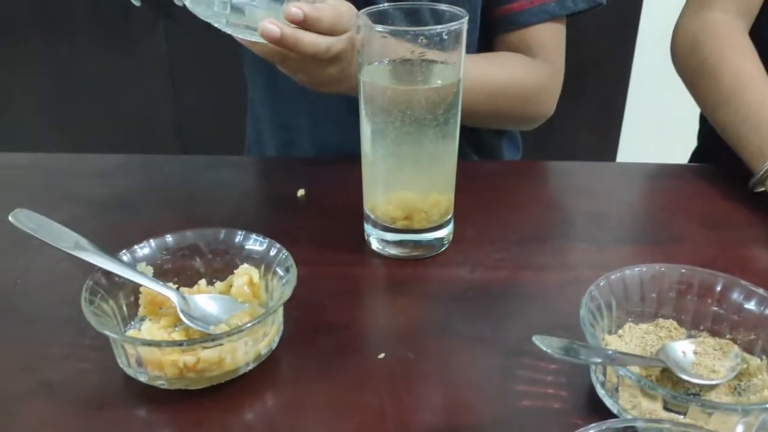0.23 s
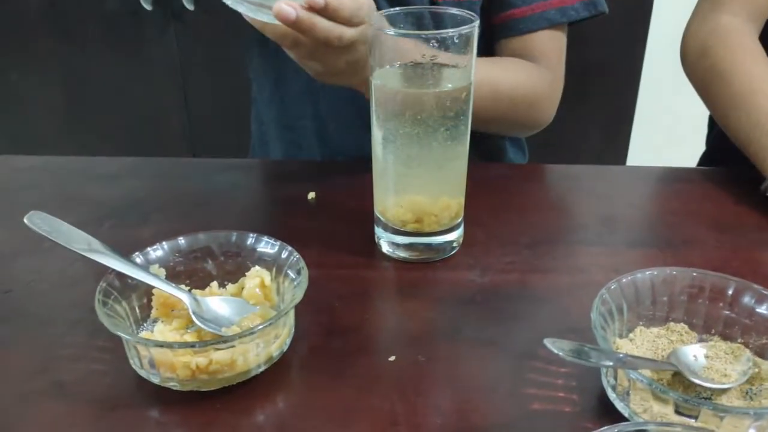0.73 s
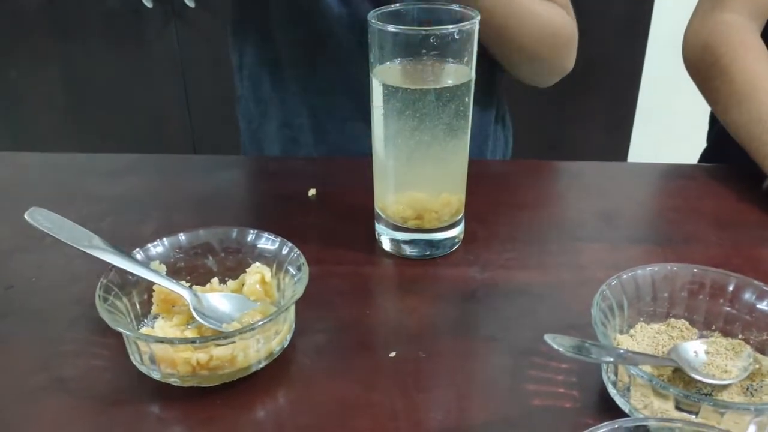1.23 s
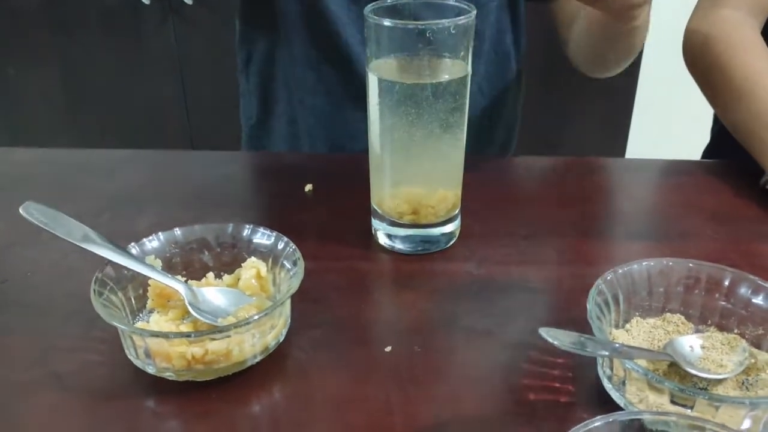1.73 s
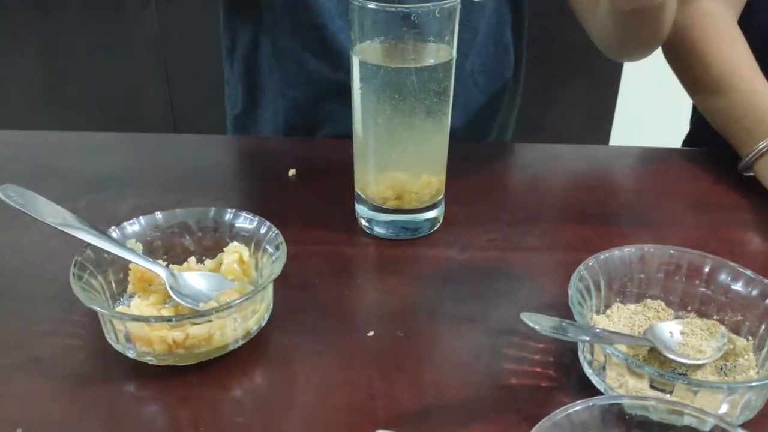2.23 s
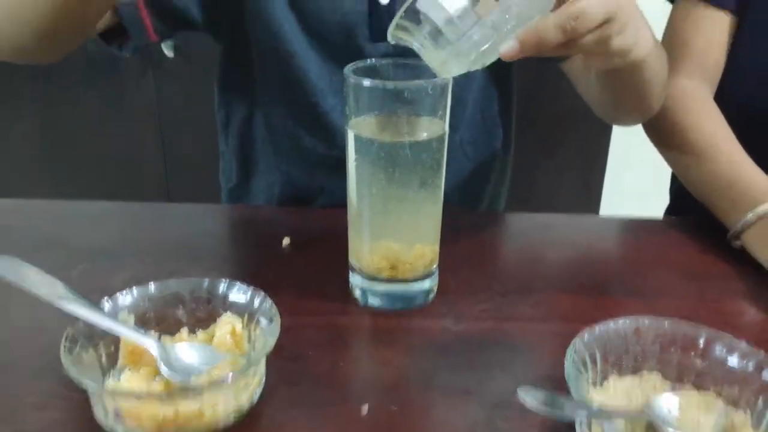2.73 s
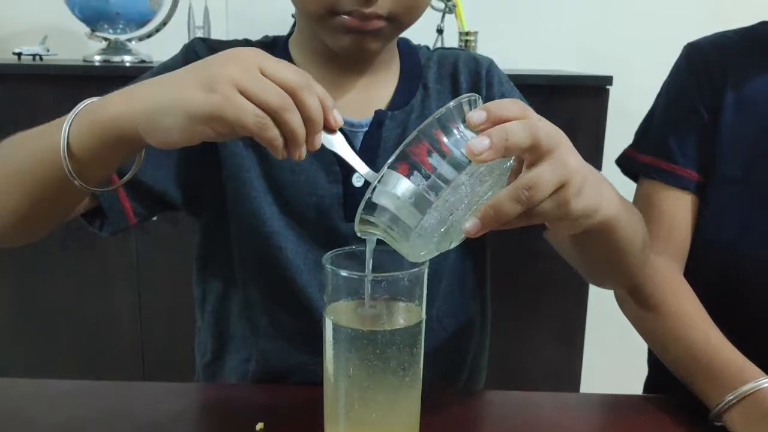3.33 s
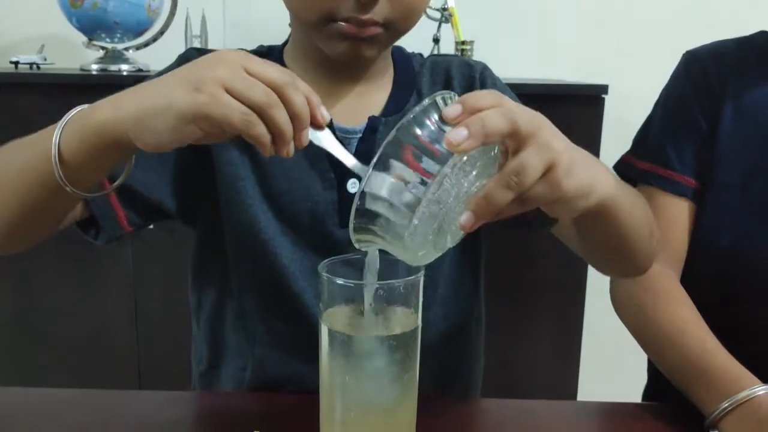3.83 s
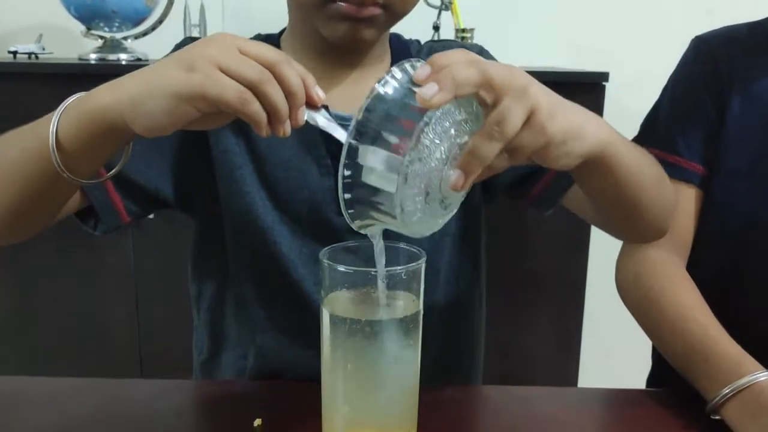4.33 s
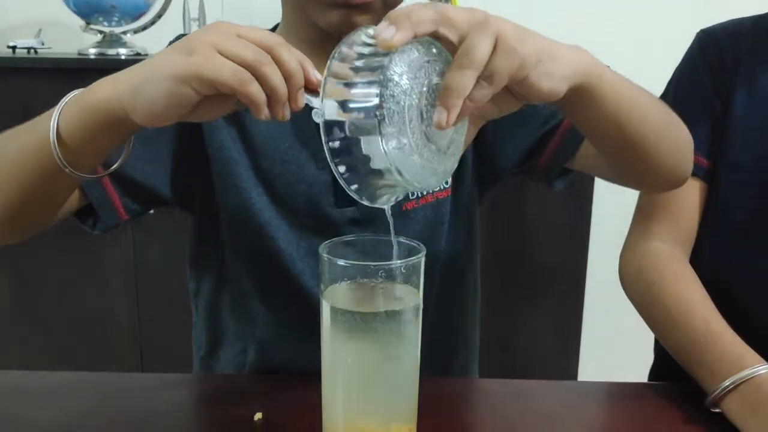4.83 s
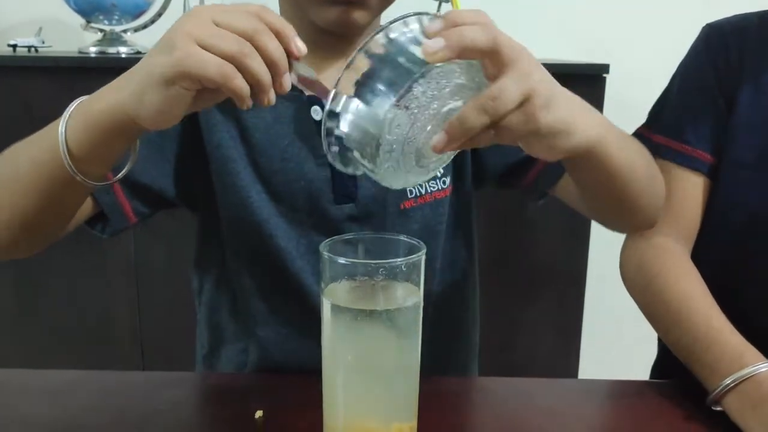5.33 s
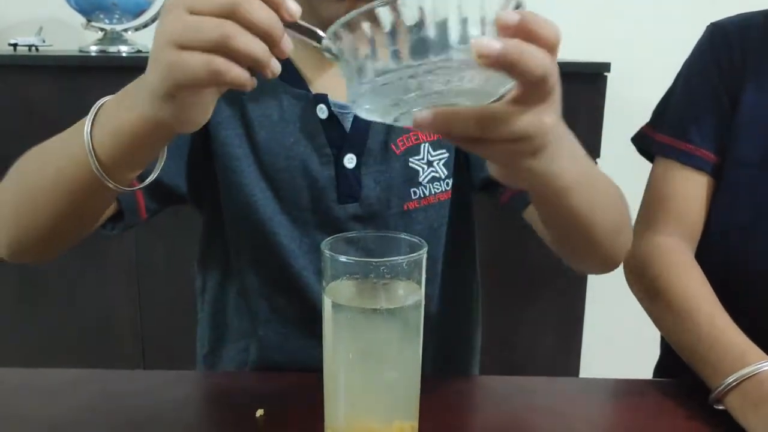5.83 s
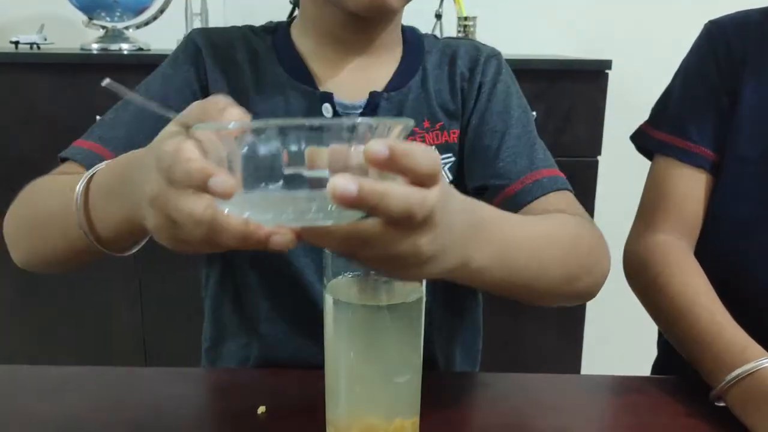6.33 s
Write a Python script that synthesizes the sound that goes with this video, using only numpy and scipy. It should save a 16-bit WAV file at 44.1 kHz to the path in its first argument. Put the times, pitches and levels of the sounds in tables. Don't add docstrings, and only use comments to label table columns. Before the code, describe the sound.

Bright, short clinks of a steel spoon on a small glass bowl, a dish set down, juice trickling faintly, traffic rumbling low behind.

```python
import sys
import numpy as np
from scipy import signal
from scipy.fft import rfft, irfft
from scipy.io import wavfile
from scipy.ndimage import uniform_filter1d

SR = 44100
rng = np.random.default_rng(int(sys.argv[2]) if len(sys.argv) > 2 else 0)


def invert_db(level):
    return 10 ** (np.asarray(level, dtype=float) / 20)


def wrap_up_sound(samples):
    columns = np.atleast_2d(samples).T
    tamed = np.clip(columns, -1, 1)
    steps = np.round(tamed * 32767).astype(np.int16)
    wavfile.write(sys.argv[1], SR, steps)


N = 289852
LEAD = 2048
HZ = np.fft.rfftfreq(N + LEAD, 1 / SR)
CLOCK = (np.arange(N + LEAD) - LEAD) / SR
CONTACT_S = 0.0005
GRAIN_DB = 3


def table(points, hz=HZ):
    f, v = np.transpose(points)
    return np.interp(np.log(hz + 1), np.log(f), v)


def bell(hz, octaves):
    return np.exp(-(np.log2((HZ + 1) / hz) / octaves) ** 2)


def noise(gain):
    x = irfft(rfft(rng.standard_normal(N + LEAD)) * gain, N + LEAD)
    return x / np.std(x)


def even(burst, colour, smooth_hz):
    x = rfft(burst)
    found = uniform_filter1d(np.abs(x) ** 2, size=int(smooth_hz * len(burst) / SR))
    fade = np.exp(-np.arange(len(burst)) / (.03 * SR))
    return irfft(x * colour / np.sqrt(found), len(burst)) * fade


def walk(rate):
    k = int(SR / rate)
    held = np.repeat(rng.standard_normal((N + LEAD) // k + 1), k)
    return uniform_filter1d(uniform_filter1d(held, k), k)[:N + LEAD]


def ring(hz, db, t60):
    t = np.arange(SR // 2)[:, None] / SR
    decay = 1000. ** (-t / np.clip(t60, .004, 3))
    modes = invert_db(db) * decay * np.sin(2 * np.pi * hz * t)
    end_fade = np.hanning(SR)[SR // 2:]
    return modes.sum(axis=1) * (1 - np.exp(-t[:, 0] / CONTACT_S)) * end_fade


def add(track, sound, s, peak_db):
    i = LEAD + int(s * SR)
    n = min(len(sound), len(track) - i)
    track[i:i + n] += sound[:n] * invert_db(peak_db) / np.abs(sound).max()


def crack():
    # f/Hz, level/dB
    crack_colour = [(500, -28.5), (1200, -15.5), (3000, 3.5), (6000, 2), (10000, -3), (14000, 0.5),
                    (16000, -15.5)]
    t = np.arange(SR // 2) / SR
    burst = rng.standard_normal(len(t)) * np.exp(-t / 0.0033) * (1 - np.exp(-t / CONTACT_S))
    x = even(burst, invert_db(table(crack_colour, np.fft.rfftfreq(len(t), 1 / SR))), 150)
    return x / np.abs(x).max()


def air():
    # f/Hz, level/dB per Hz
    air_colour = [(32, -34.5), (55, -2), (87, -7.5), (195, -5.5), (253, -9.5), (362, -10), (531, -18.5),
                  (1880, -22), (5000, -31.5), (6510, -30), (14300, -32), (15400, -29), (16500, -61.5)]
    # f/Hz, likeness/-1..1
    air_alike = [(60, 0.7), (130, 0.96), (290, 0.85), (640, 0.48), (1410, -0.38), (3100, -0.54),
                 (6820, 0.95), (15000, 0.72)]
    # t/s, half width/s, drone level/dB, rumble level/dB
    bass_swells = [
        (.2, 0.97, 1.5, 3),
        (2.1, 0.091, 5, 2.5),
        (3.15, 0.13, 12.5, 1),
        (4.0, 0.12, 7.5, 0.5),
        (4.17, 0.22, 3.5, 11),
        (4.6, 1, 2.5, 2.5),
    ]
    alike = np.clip(table(air_alike), -.9, .99)
    mid_side = rfft(rng.standard_normal((2, N + LEAD)))
    mid, side = mid_side * invert_db(table(air_colour)) * np.sqrt([1 + alike, 1 - alike])
    pair = np.array([mid + side, mid - side])
    bands = ((50, 145), (145, 450), (450, SR))
    rumble, drone, hiss = (irfft(pair * (HZ >= lo) * (HZ < hi), N + LEAD) for lo, hi in bands)
    swell = sum(np.outer(db, np.exp(-((CLOCK - s) / width) ** 2)) for s, width, *db in bass_swells)
    street = invert_db(swell[0] - 0.5) * drone + invert_db(swell[1]) * rumble
    deep = invert_db(-63.5 + walk(13.0)) * noise(bell(35.93, 0.21))
    return (street + hiss) * invert_db(-70.5) / np.std(hiss) + deep


def room():
    # f/Hz, t60/s, level/dB, side share/1
    room_bands = [(155, 0.98, -1, .15), (394.4, 0.76, -4.5, 0.22), (811, 0.86, -7, 0.99),
                  (2080, 0.82, -14.5, 1.3), (4450, 0.69, -14.5, 1.21), (9300, 0.53, -6.5, 0.53),
                  (14470, 0.36, -3.5, 0.57)]
    t = np.arange(SR) / SR
    hz = np.fft.rfftfreq(SR, 1 / SR)
    tail = 0
    for k, (f, t60, db, width) in enumerate(room_bands):
        share = table([(r[0], 1. * (j == k)) for j, r in enumerate(room_bands)], hz)
        mid, side = irfft(rfft(rng.standard_normal((2, SR))) * share, SR)
        pair = mid + width * side * np.array([[1], [-1]])
        tail = tail + invert_db(db) * pair * 1000. ** (-t / t60)
    build_up = np.clip(t / 0.0051, 0, 1) ** 2
    return tail * build_up / np.sqrt(SR / 100)


def ports(share):
    # f/Hz, left minus right level/dB
    port_difference = [(700, -1), (2700, -3.5), (4600, -10), (6400, -15), (8500, -7.5), (10300, 4.5),
                       (11000, 7.5), (12000, 14), (15000, 25)]
    left = invert_db(share * table(port_difference))
    lag = np.exp(-2j * np.pi * HZ * .0001)
    return 2 * np.array([left * lag, np.ones_like(left)]) / (1 + left)


def dish():
    dish_hz = [1487, 2632, 3241, 4430, 4931, 5949, 6340, 7440, 10870, 11190, 1476, 2604]
    # level/dB, t60/s
    dish_modes = [(-15, 1.5), (-7.5, 0.5), (-8.5, 0.53), (-11.5, 0.15), (0.5, 0.061), (-8, 0.2),
                  (5.5, 0.036), (-1, 0.07), (-21, 0.05), (-4.5, 0.043), (-10, 0.41), (-27, 0.44)]
    # f/Hz, level/dB, t60/s
    board_modes = [(65.3, 0.5, 0.14), (190.4, 4.5, 0.061), (286, 6, 0.076), (431, -12.5, 0.067),
                   (630, 10.5, 0.018), (768, 6.5, 0.091), (830, 14, 0.015), (830, 9.5, 0.071),
                   (978, -11, 0.07), (1174, 8.5, 0.052), (1800, 10.5, 0.027)]
    # t/s, peak level/dB, dish level/dB, extra room level/dB
    set_down = [
        (2.978, -11, 6, -1.5),
    ]
    (s, peak_db, dish_db, room_db), = set_down
    db, t60 = np.transpose(dish_modes)
    glass = ring(np.array(dish_hz), db + dish_db, t60)
    board = noise(bell(866, 1.2))[:SR // 2]
    thud = board * np.exp(-np.arange(SR // 2) / (0.0056 * SR))
    hz = np.fft.rfftfreq(len(thud), 1 / SR)
    thud = even(thud, np.exp(-(np.log2((hz + 1) / 800) / 1.14) ** 2), 50)
    thud = 1.81 * thud / np.abs(thud).max()
    landing = ring(*np.transpose(board_modes)) + glass + invert_db(7) * crack() + invert_db(16) * thud
    out = np.zeros(N + LEAD)
    add(out, landing, s, peak_db)
    return out, room_db


def trickle():
    # f/Hz, width/octaves, level/dB
    fizz_bands = [(817, 0.25, -1), (2055, .2, -2), (2720, .15, -0.5)]
    fizz = 0
    for hz, octaves, db in fizz_bands:
        fizz = fizz + invert_db(db + GRAIN_DB * walk(80)) * noise(bell(hz, octaves))
    flow = np.exp(-((CLOCK - 3.795) / 0.51) ** 2)
    return invert_db(-72) * flow * fizz


def gliding_notes(events):
    out = np.zeros(N + LEAD)
    t = np.arange(SR // 10) / SR
    for s, peak_db, hz, t60, glide in events:
        note = np.sin(2 * np.pi * hz * (t + glide * t ** 2)) * 1000. ** (-t / max(t60, .005))
        add(out, note * (1 - np.exp(-t / 0.0022)), s, peak_db)
    return out


def drips():
    # t/s, peak level/dB, f/Hz, t60/s, glide/s^-1
    drops = [
        (3.741, -43, 1660, 0.018, -6.5),
        (3.753, -48.5, 1592, 0.05, -1),
        (4.208, -44, 1695, 0.023, -8.5),
        (4.774, -52, 1800, 0.024, -3),
        (5.1522, -43, 2160, 0.013, -2),
        (5.178, -28, 1980, 0.0095, 4),
        (5.35, -42, 2040, 0.0045, 5),
    ]
    return gliding_notes(drops)


def finger_bumps():
    # t/s, peak level/dB, f/Hz, t60/s, glide/s^-1
    bumps = [(5.89, -65, 1510, 0.044, -0.84), (5.936, -58, 1366, 0.076, .1),
             (5.971, -52.5, 1385, 0.046, -0.74), (5.996, -58, 1160, .02, .1), (6.035, -62, 1380, .02, .1),
             (0.5882, -61, 1670, .03, -0.1), (1.146, -47.5, 1635, 0.025, .1),
             (6.239, -54.5, 1380, 0.033, .1), (6.113, -42, 2460, 0.027, -0.17),
             (6.128, -48.5, 2330, 0.013, .1), (6.156, -48, 2520, 0.054, 0.7),
             (0.974, -76, 431, 0.013, -0.1), (5.626, -70, 690, 0.017, -0.07),
             (5.824, -63, 678, 0.042, -0.079), (6.237, -45.5, 457, 0.0064, -0.003),
             (6.309, -54, 620, 0.011, -0.16), (6.457, -55.5, 670, 0.017, -0.063)]
    return gliding_notes(bumps)


def squeak():
    # t/s, length/s, f/Hz, level/dB
    squeaks = [
        (0.97, 0.13, 1200, -77),
        (1.65, 0.45, 1159, -71),
    ]
    waver, flutter_db = 1 + .022 * walk(90), 4 * walk(60)
    out = 0
    for s, length, hz, db in squeaks:
        pitch = hz * waver * (1 - 0.4 * np.exp(-np.abs(CLOCK - s) / 0.033))
        swell = np.sqrt(np.sin(np.pi * np.clip((CLOCK - s) / length, 0, 1)).clip(0))
        out = out + swell * invert_db(db + flutter_db) * np.sin(2 * np.pi * np.cumsum(pitch) / SR)
    return out


def scrapes():
    # t/s, peak level/dB
    ticks = [
        (4.207, -45),
        (4.047, -38),
        (5.12, -45),
        (5.259, -54),
        (5.2837, -57),
        (5.5, -55.5),
    ]
    # t/s, fade/s per 9 dB, scrape level/dB, hiss above it/dB, rub above it/dB
    drags = [
        (0.995, 0.08, -70.5, -13, -0.5),
        (3.72, -0.2, -69, -18, -3),
        (2.04, 0.26, -71.5, -11.5, -5),
        (5.77, -0.07, -80, 11, -15),
        (5.834, 0.1, -72, 6.5, -0.5),
        (5.97, 0.7, -73.5, -17, -3),
        (6.26, 0.1, -67.5, -15, 1.5),
        (6.53, -0.12, -63, 4, -17),
    ]
    hiss_bands = bell(9900, 0.68) + .9 * bell(10500, .05) + .6 * bell(12600, .04) + 1.1 * bell(4600, 0.091)
    hiss = noise(hiss_bands)
    scrape = noise(bell(3050, 1.0) + 1.1 * bell(2700, 0.03))
    rub = noise(bell(1310, 0.76))
    out = np.zeros(N + LEAD)
    for s, peak_db in ticks:
        add(out, np.diff(crack()[:200]), s, peak_db)
    for s, fade_s, db, hiss_db, rub_db in drags:
        away = np.maximum((s - CLOCK) / .75, CLOCK - s)
        pressure = np.exp(-away / max(fade_s, .01))
        friction = invert_db(hiss_db) * hiss + scrape + invert_db(rub_db) * rub
        out += pressure * invert_db(db + GRAIN_DB * walk(160)) * friction
    return out


def spoon():
    # f/Hz, level/dB, t60/s
    knock_modes = [(727, -14, 0.036), (1360, -11, 0.032), (1592, 5.5, 0.014), (1821, 1, 0.016)]
    # f when dry/Hz, drop when juice wets the rim/Hz, half spacing of the pair/Hz
    bowl_modes = [(2678, 45, 24), (4650, 0, 12), (6310, 0, -25), (6455, 100, 12), (7200, 0, 20),
                  (9790, 0, 25), (10100, 0, 25), (10370, 0, 25), (11015, 270, 22), (11250, 0, 30),
                  (11545, 90, 22), (14240, 0, 14), (15110, 260, 18), (15490, 0, 20)]
    spoon_hz = [3100, 3480, 3800, 4110, 4450, 6610, 5170, 5420, 6950, 8720, 9550, 12400, 13780, 14600]
    # t/s, share/0..1
    wet_rim = [
        (0, 0.42),
        (1.6, 0),
        (3.4, 0.31),
        (4.03, 0.93),
        (4.5, 0.5),
        (5.0, 0.48),
        (6.1, 0.02),
    ]
    place_crack_db = [-16.5, -13.5, -12.5, -16.5, -8, -11, -12.5, -2.5, -8, -6.5, -5.5, -1.5, 0, -4.5, -14,
                      -2, -13, -10.5, -12, -3, -9.5, -12]
    # t/s, peak level/dB, knock level/dB, treble tilt/dB per octave,
    # t60 left by the grip/s
    rim_blows = [
        [(4.0317, -7.5, -31, 2, 0.072), (4.1111, -32, -26, -2, 0.021)],
        [(4.5151, -4, -60, 5, 0.057)],
        [(5.021, -20, -24.5, -2, 0.043)],
        [(-.02, -9, -30, 3, 0.036)],
        [(1.5521, -21.5, -15, -0.2, 0.086)],
        [(1.584, -21.5, -15, 0, 0.035)],
        [(1.6413, -15.5, -21, 4, 0.021)],
        [(6.113, -14.5, -13, 1, 0.092)],
    ]
    wall_blows = [
        [(3.8916, -22, -7.5, 0, 0.03), (4.3405, -21.5, -7.5, -1.5, 0.043), (4.4313, -36.5, -21, 7, 0.0066)],
        [(4.7835, -19.5, -9, -3.2, 0.032), (4.9197, -36, -23, 6.5, 0.013), (4.9424, -56, -12, 3, 0.048)],
        [(2.9184, -23, 0.74, 0.39, 0.019), (3.4228, -23.5, 2.5, 0.26, 0.03)],
        [(0.5878, -35.5, -7, 0.27, 0.021)],
        [(2.3307, -21.5, 7.2, 0.1, 0.037)],
        [(1.1455, -31.5, 2.1, .3, 0.038)],
        [(3.7389, -36.5, -10, 1.4, 0.008), (3.8621, -49, -21, .3, 0.0071)],
        [(5.151, -34.5, -9, 8.6, 0.005)],
        [(5.3497, -42, 3, -19, 0.029), (5.4024, -49, 3.3, 3, 0.044)],
        [(5.6274, -31.5, -0.98, .3, 0.044)],
        [(5.972, -43.5, -2.5, 1.8, 0.069)],
        [(6.459, -37.5, -17.5, 0.33, 0.051)],
        [(1.76, -54, -30, -12, 0.11), (5.806, -51, -16, 11, .05), (5.921, -52.5, -6, -1, 0.12),
         (6.312, -41, -23, 5, 0.034)],
        [(5.823, -44.5, -10, .3, 0.025), (5.873, -65, 5.5, .3, 0.016), (6.237, -39, 5, 0.33, 0.016)],
    ]
    rim_bowl_db = [(-10, -22.5, -2, 4, -15.5, -23.5, -35, -22.5, -7.5, -34, -18.5, -47, -31.5, -29),
                   (-7.5, -22.5, -6, 5.2, -20, -19.5, -34.5, -28.5, -6.5, -19.5, -10.5, -46, -26, -22),
                   (-12.5, -19.5, -7.5, 1.45, -26, -22, -36, -31.5, -10, -22, -20, -45, -26, -32),
                   (-19.5, -31, -10.5, 0.5, -21, -24, -23, -37.0, -7.5, -20, -25, -40, -49, -28),
                   (-19, -35, -23, 1.1, -29, -20, -31.0, -6.5, -2.5, -20, -36, -16, -8, -11),
                   (-13, -44, -2, 3, -21, -23, -30, -20, -4, -24, -23, -17, -17, -9),
                   (-11, -19, 1, 8.7, -27, -6.5, -30, -4, -7, -19, -15, -25, -30, -14),
                   (-16.5, -39.0, -0.5, 5.3, -35, -21, -8, -34.0, -2.5, -27, -14, -33, -12, -20)]
    rim_spoon_db = [(-47, -33.5, -39, -37, -31, -22, -38.5, -24.5, -13, -41, -24, -47.5, -47.5, -41),
                    (-26, -40.5, -27.5, -38.5, -31, -36.5, -41, -23.5, -19, -25.5, -28.5, -47, -45.5, -36),
                    (-47, -45, -22, -43, -20, -38, -20, -19, -15, -39, -41, -47, -47.5, -41),
                    (-43, -49, -27, -60, -17, -49, -40, -41, -16, -27, -33, -30, -21, -53),
                    (-30.5, -6, -47, -32, -9, -45.0, -26, -47, -25, -8, -8, -34, -24, -17),
                    (-38, -20, -40, -18, -3, -19, -24, -34, -5, -26, -24, -30, -17, -21),
                    (-43, -46, -20, -39, -42, -1, -45.0, -26, -15, -39, -11, -44, -16, -2),
                    (-33, -44, -6, -18, -32, -12, -34.0, -22, -3.5, -42, -33, -40, -38, -17)]
    wall_bowl_db = [(-17, -16, -6, -11.5, -24.5, -34, -16.5, -14, -12, -11.5, -0.5, -40.5, -18, -30),
                    (-19.5, -18.5, -5, -9, -13, -44, -19, -8, -14, -17, -3.5, -35, -16, -19),
                    (-13, -2.5, -8, -9, -22, -9, 1, -16, -4, 3, -0.5, -10, -3.5, -13),
                    (-46, -40, -18, -27, -2, -35, -2, 2.5, -4, -8, -10, -33, -36, -7),
                    (-6.5, -0.5, -7, -6, -20, -16, 0, 7, -20, -16, -21, -1, -13, -14),
                    (-8, -18, -35, -38, -14, -24, 2, -15, -23, -30, -38, -12, -10, -26),
                    (-30, -9, -28, -17, 5, -4, -9, -5, -19, -22, -19, 1.5, -34, -27),
                    (-14, -12, -20.5, -22, 1.5, -16.5, -20.5, -14, -12, -11, -9, -5, -20, -22),
                    (-17, -13, -12, 4.5, -16, -22, -20, -22, -21, -22, -8, -22, -24, -27),
                    (-8, -32.5, -5, 3.5, -4, -30, -9, -5, -10.5, -20, -10, -29, -16, -14),
                    (-2.5, -26.5, -5, -8, -6, -16, -4, -12, -8, -20, -2, -22, -6, -14),
                    (-14, -2, -22, -21, -23, -32, -33, -29, -13, -15, -7, -12, -19, -20),
                    (4.5, -22, -19, 0, -23, -18, -24, -24, -23, -23, -25, -30, -30, -28),
                    (-9, -7, -6, -7, 0, -15, -14, -6, -4, -19, -16, -20, -20, -19)]
    wall_spoon_db = [(-9, -39.5, -28.5, -31, -34.5, -20.5, -18.5, -18.5, -17, -31.5, -43.5, -30.5, -36.5, -11.5),
                     (-11, -37, -44, -43, -40, -20, -11, -20, -22, -40, -41, -30, -32.5, -18),
                     (-0.5, -44.5, -19.5, -31.5, -5.5, -29, -14.5, -6.5, -15, -25, -22, -26, -46.5, -8),
                     (-25, -30, -9, -38, -31, -38, -23, 0, -9, -15, -27, -30, -24, -9),
                     (-1.5, -11, -17.5, -40, -11.5, -11, -18, -21, -11, -44, -15, -40, -17, -29),
                     (-1, -29, -45, -24, 0, -40, -23, 2.5, 8.5, 6, 4, -38, 0, -3),
                     (-40, -38, -40, -39, -27, -13, -40, -32, -3.5, -6.5, 1.5, -12, -8, -8),
                     (-32, -45, -32, -44, -20, -14, -47, -28, -9, -12, -21, -16, -21, -18),
                     (6, -24, 7.5, 9.5, 3, -16, 3, -20, -16, -29, -18, -4, -10, -14),
                     (-0.5, -17, 2.5, -3, -7, -24, -5, -6, -27, -35, -10, -33, -38, -16),
                     (0, -21, -25, -19, -20, -24, -9, -22, -15, -21, -10, -24, -25, -20),
                     (-9, -7, -17, -1, 9.5, -16, -5, -15, -17, -20, -21, -2, -5, -11),
                     (-3, -11, -18, -28, -23, -25, -24, -24, -25, -22, -30, -26, -30, -31),
                     (-2.5, 3, -1, -15, -12, -20, -8, -9, -6, -28, -9, -7, -20, -19)]
    out = np.zeros(N + LEAD)
    knock = ring(*np.transpose(knock_modes))
    dry_hz, sag_hz, half_hz = np.transpose(bowl_modes)
    responses = np.hstack([rim_bowl_db + wall_bowl_db, rim_spoon_db + wall_spoon_db])
    for db, crack_db, blows in zip(responses, place_crack_db, rim_blows + wall_blows):
        for s, peak_db, knock_db, tilt_db, grip_t60 in blows:
            wet_hz = dry_hz - sag_hz * np.interp(s, *np.transpose(wet_rim))
            hz = np.append(wet_hz, spoon_hz)
            octaves = np.log2(hz / 6400)
            split = 15 * 2 ** octaves * rng.uniform(0.53, 1.63, len(hz))
            split[:len(bowl_modes)] = half_hz
            lowest, low = hz < 2750, (hz > 2750) & (hz < 5300)
            t60 = grip_t60 * (1 + 1.54 * lowest - 0.41 * low + .6 * (hz == dry_hz[1]))
            level_db = db + tilt_db * octaves
            tone = ring(hz - split, level_db, t60) + ring(hz + split, level_db - 5.0, 1.36 * t60)
            contact = invert_db(crack_db) * np.abs(tone).max() * crack()
            add(out, tone + invert_db(knock_db) * knock + contact, s, peak_db)
    return out


def scene():
    # delay/s, level/dB
    echo_paths = [(.0012, -21), (.0035, -9.5), (.0075, -21), (.0152, -14), (0.022, -21), (.031, -21),
                  (.045, -17.5)]
    thud, thud_room_db = dish()
    bowl = spoon() + scrapes()
    drops = drips() + finger_bumps()
    echoes = 1 + sum(invert_db(db) * np.exp(-2j * np.pi * HZ * s) for s, db in echo_paths)
    direct = ports(1) * echoes * rfft(bowl + drops + thud)
    to_walls = bowl + invert_db(-7) * drops + invert_db(thud_room_db) * thud
    tail = ports(0.45) * rfft(room(), N + LEAD) * rfft(to_walls)
    low_cut = (1j * HZ / (1j * HZ + 90)) ** 2
    near = irfft(low_cut * (direct + tail), N + LEAD)
    return (near + air() + squeak() + trickle())[:, LEAD:]


def low_pass(x):
    return signal.sosfilt(signal.butter(12, 16970, fs=SR, output="sos"), x)


def record(dry):
    top = signal.ellip(6, .2, 30, 15950, fs=SR, output="sos")
    return low_pass(signal.sosfilt(top, dry))


dry = scene()
out = record(dry)
wrap_up_sound(out)
```